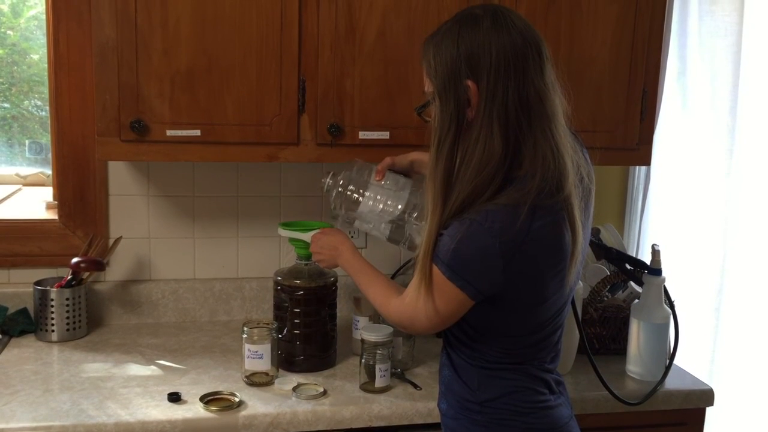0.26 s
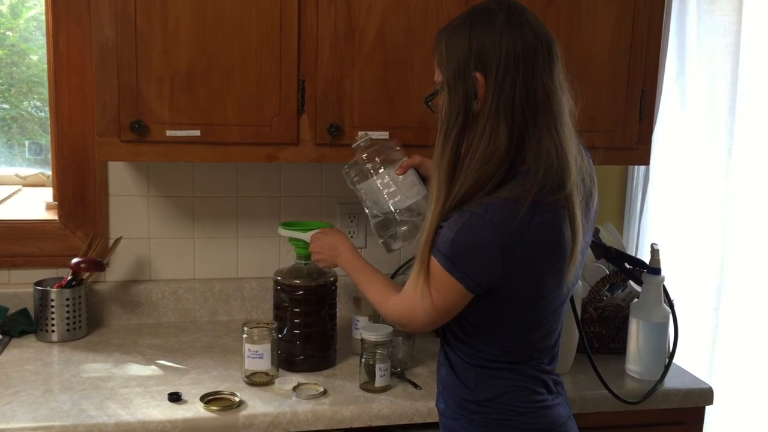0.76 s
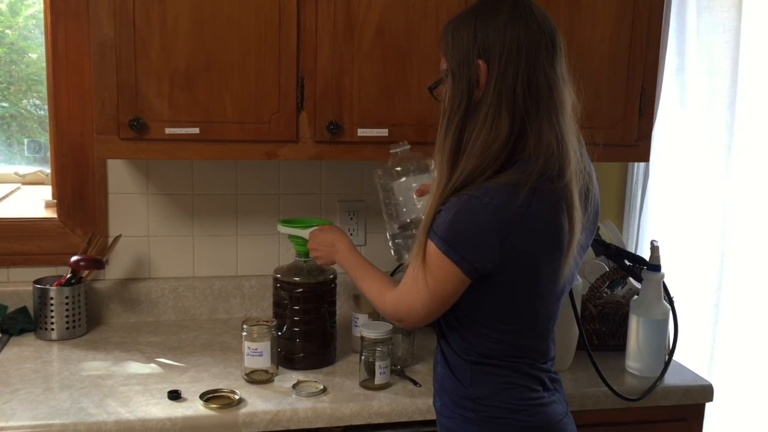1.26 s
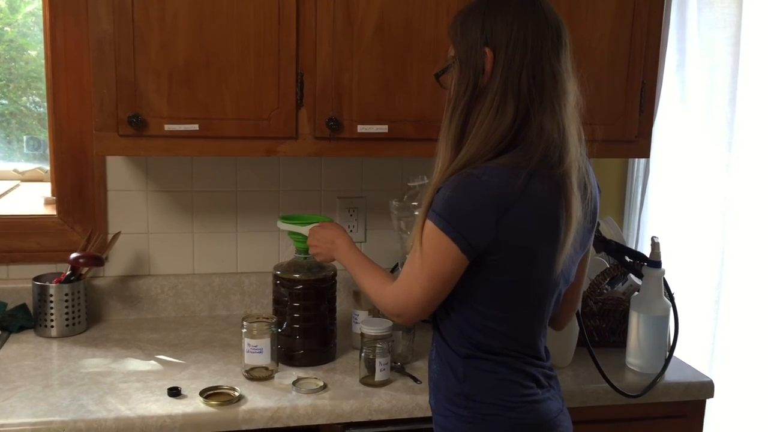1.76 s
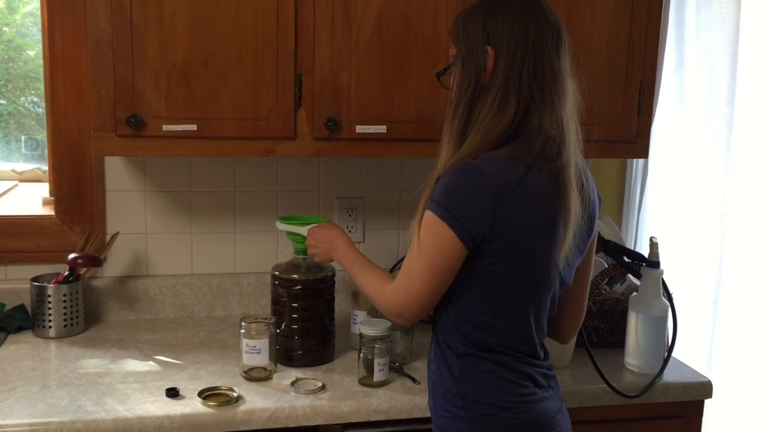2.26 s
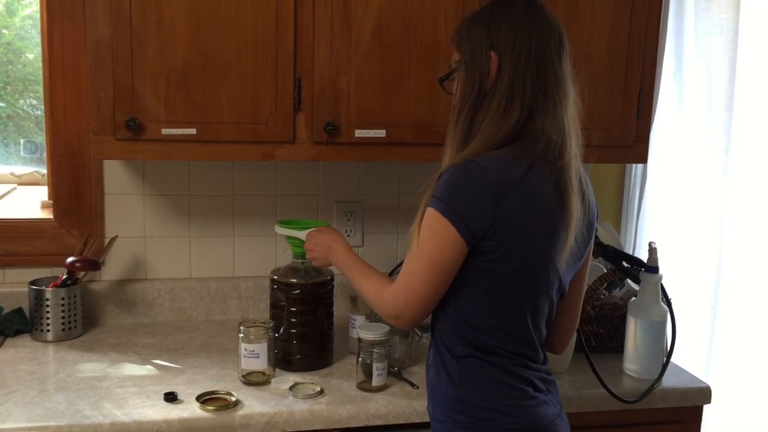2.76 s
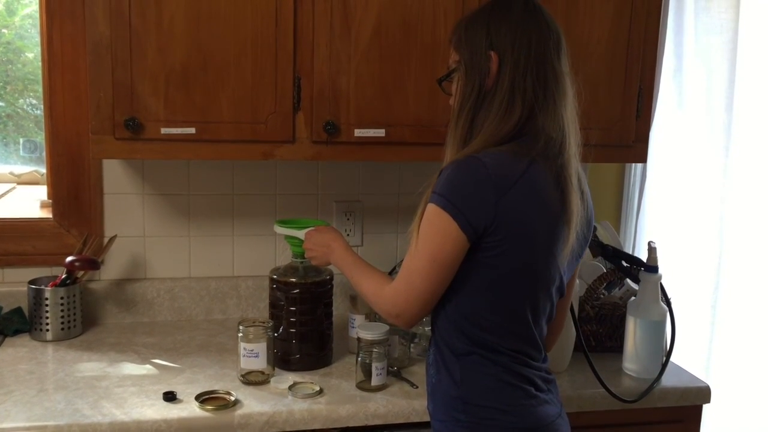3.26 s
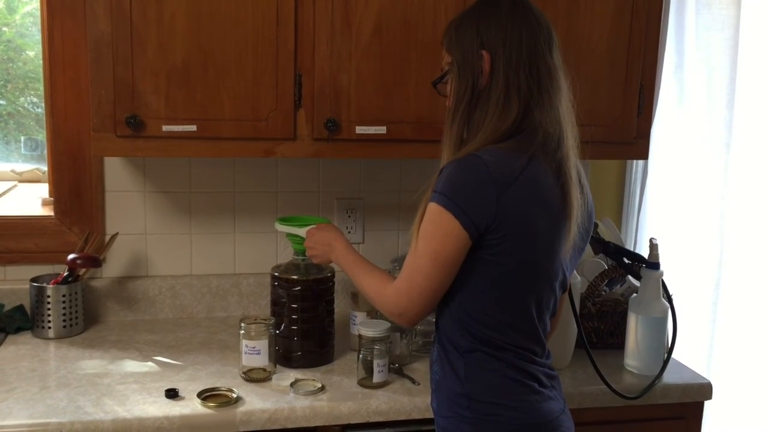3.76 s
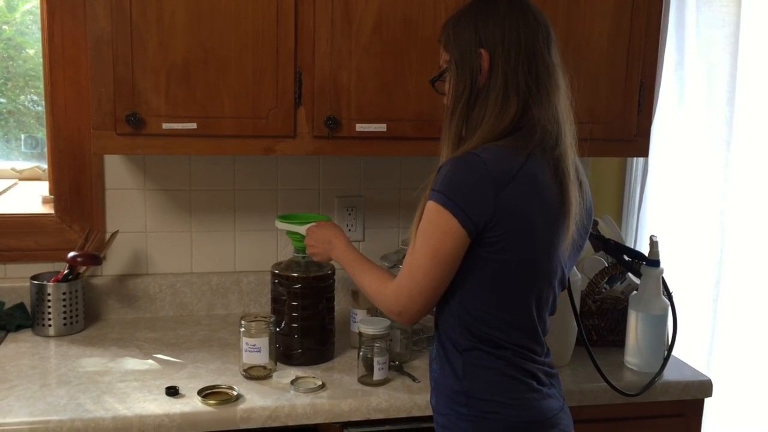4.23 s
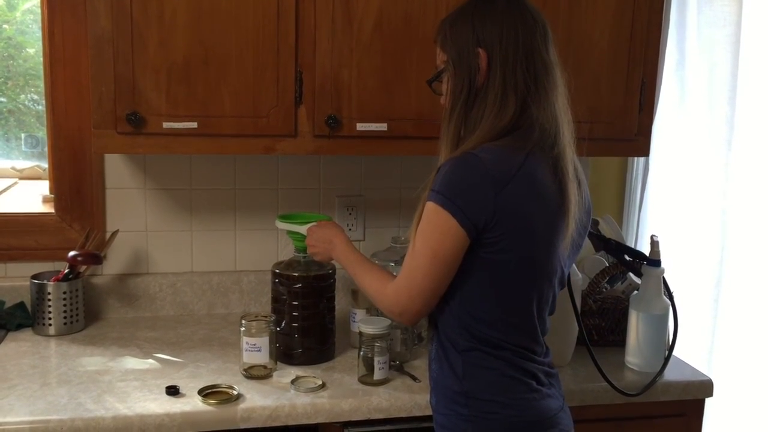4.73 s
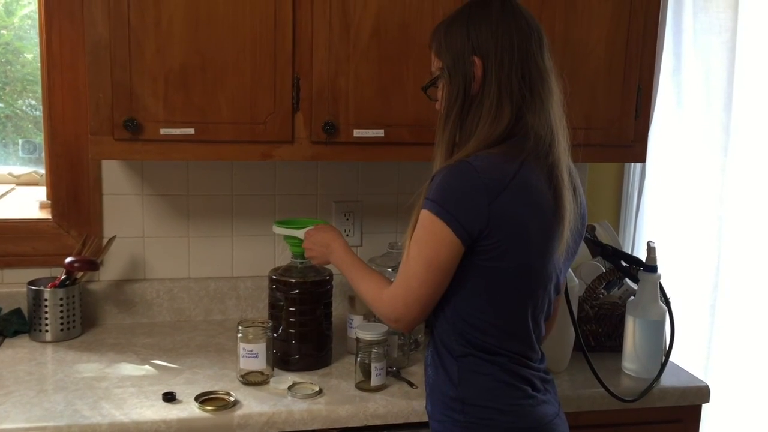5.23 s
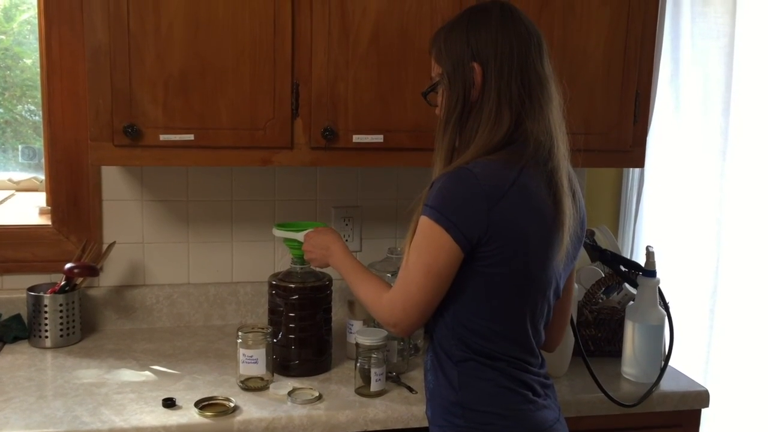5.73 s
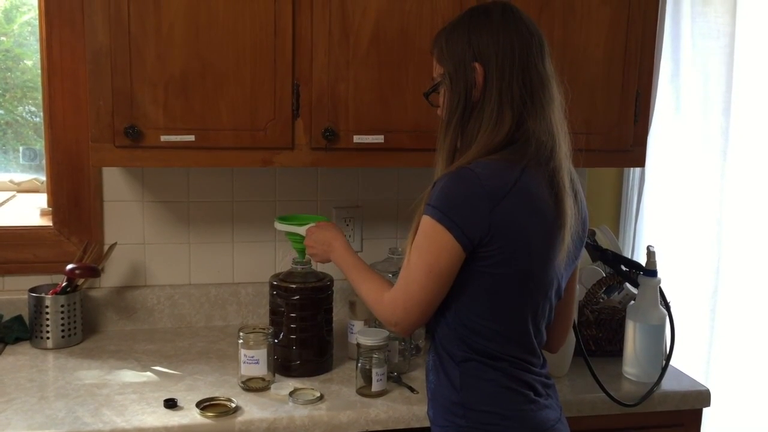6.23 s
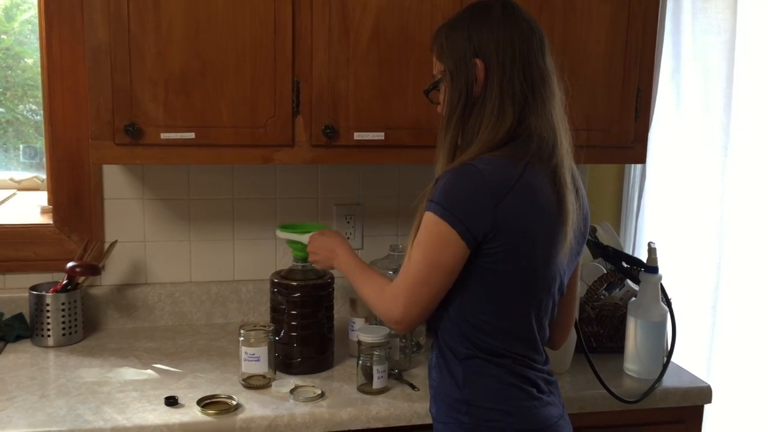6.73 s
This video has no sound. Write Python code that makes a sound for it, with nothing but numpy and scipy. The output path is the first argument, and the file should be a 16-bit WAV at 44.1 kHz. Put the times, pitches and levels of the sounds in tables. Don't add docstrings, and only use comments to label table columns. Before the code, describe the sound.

Quiet room air first, with one tiny tick. Then hollow glugs, slapping water, closing bubbles and high clear drips, all ringing briefly off hard kitchen surfaces. The jug thumps, lightly touches glass and drags over the counter. Sparse small drips and a faint fizz follow, then a double plop and several close plastic taps with a low thud at the end.

```python
import sys
import numpy as np
from scipy import signal
from scipy.fft import rfft, irfft
from scipy.io import wavfile
from scipy.ndimage import uniform_filter1d

SR = 44100
rng = np.random.default_rng(int(sys.argv[2]) if len(sys.argv) > 2 else 0)


def dump(signal):
    limited = np.clip(np.atleast_2d(signal).T, -1, 1)
    pcm = np.round(limited * 32767).astype(np.int16)
    wavfile.write(sys.argv[1], SR, pcm)


def invert_db(level):
    return 10 ** (np.asarray(level, dtype=float) / 20)


N = 308259
DROP_GLIDE_OCT = 0.01


def evened(x):
    return x / np.sqrt(np.mean(x ** 2) + 1e-20)


def read(points, hz):
    f, value = np.transpose(points)
    return np.interp(np.log(hz + 1), np.log(f + 1), value)


def curve(rows, rise_db_per_s, fall_db_per_s):
    crest_s, db = np.transpose(rows)
    t = np.arange(0, N + 64, 64)[:, None] / SR - crest_s
    drop_db = np.maximum(-rise_db_per_s * t, fall_db_per_s * t)
    power = (invert_db(db - drop_db) ** 2).sum(axis=1)
    return np.interp(np.arange(N) / 64, np.arange(len(t)), np.sqrt(power))


def add(mix, s, sound):
    part = mix[round(s * SR):][:len(sound)]
    part += sound[:len(part)]


def noise(points, patchy_db, size=1024):
    hz = np.fft.rfftfreq(size, 1 / SR)
    a, b, patches = rng.standard_normal((4 * N // size + 5, len(hz), 3)).T
    patches = uniform_filter1d(patches, size=9, axis=0)
    patches = evened(uniform_filter1d(patches, size=9, axis=1))
    z = (a + 1j * b) * invert_db(read(points, hz)[:, None] + patchy_db * patches)
    z[hz < points[0][0]] = 0
    return evened(signal.istft(z, nperseg=size, noverlap=3 * size // 4)[1][:N])


def bubble(hz, cycles, glide_oct):
    cycles = max(cycles, 1)
    u = np.arange(int(3 * cycles / hz * SR)) * hz / SR / cycles
    turns = np.cumsum(hz * 2 ** (glide_oct * u)) / SR
    shape = (1 - np.exp(-6 * u)) ** 2 * np.exp(-3 * u)
    return shape / shape.max() * np.sin(2 * np.pi * turns)


def rung(rows, glide_oct):
    out = np.zeros(N)
    for s, db, hz, cycles in rows:
        add(out, s, invert_db(db) * bubble(hz, cycles, glide_oct))
    return out


def swarm(low_hz, high_hz, per_s, cycles, spread_db):
    out = np.zeros(N)
    kinds = [bubble(hz, cycles, 0.27) for hz in np.geomspace(low_hz, high_hz, 24)]
    for when, kind, size in rng.random((int(per_s * N / SR), 3)):
        gain = invert_db(spread_db * min(-np.log(size), 3))
        add(out, when * N / SR, gain * kinds[int(kind * len(kinds))])
    return evened(out)


def struck(modes, tilt_db=0, spread_db=3, order=0):
    t = np.arange(3000) / SR
    ring = np.zeros(len(t))
    for k, (hz, width_hz, db) in enumerate(modes):
        level_db = db + spread_db * rng.standard_normal() + tilt_db * np.log2(hz / 1000)
        decay = np.exp(-np.pi * max(width_hz, 40) * t)
        onset = 1 - np.exp(-hz * t)
        ring += invert_db(level_db) * decay * onset * np.sin(2 * np.pi * hz * t + np.pi * order * k)
    return ring / abs(ring).max()


def sway():
    # (time [s], level [dB])
    gusts = [(0.05, -47.5), (0.8, -42.5), (1.15, -52.5), (1.75, -44), (2.02, -44.5), (2.45, -52.5),
             (2.76, -50), (3.05, -46), (3.5, -49), (3.85, -57), (4.17, -46.5), (4.63, -47), (4.94, -47.5),
             (5.27, -47.5), (5.65, -49.5), (5.88, -45), (6.48, -48), (6.85, -44.5)]
    hz = np.fft.rfftfreq(N, 1 / SR)
    wobble = irfft(rfft(rng.standard_normal(N)) * np.exp(-((hz - 9.2) / 2.7) ** 2), N)
    wobble /= abs(signal.hilbert(wobble)) + 0.13 * wobble.std()
    return curve(gusts, 39, 59.5) * evened(wobble)


def rumble():
    # (frequency [Hz], density [dB per Hz])
    floor = [(16, -3.5), (30, 0), (50, -13), (105, -14.5), (135, -24.5), (160, -49)]
    # (time [s], level [dB])
    shifts = [
        (0, -74.5),
        (2.1, -79),
        (3.0, -75),
        (4.2, -71.5),
        (6.2, -83),
    ]
    level = curve(shifts, 12, 46) + invert_db(-71.5)
    return level * noise(floor, patchy_db=1, size=8192)


def drone():
    # (time [s], level [dB])
    swell = [
        (4.6, -84.5),
    ]
    hum = noise([(200, -17.5), (272, 1.5), (320, -9), (500, -36)], patchy_db=-2, size=4096)
    return (curve(swell, 24, 7) + invert_db(-97)) * hum


def hiss():
    # (frequency [Hz], density [dB per Hz])
    still_air = [(76, -20), (130, -0.5), (262, -4.5), (333, -10.5), (361, 3), (391, -8.5), (424, -6),
                 (633, -9.5), (758, -8), (1590, -12.5), (15600, -35)]
    return invert_db(-82) * noise(still_air, patchy_db=0.5)


def ticks():
    # (time [s], peak level [dB])
    stray = [
        (.26, -69),
        (1.929, -78),
        (2.011, -64),
        (5.49, -70),
        (6.515, -71),
    ]
    out = np.zeros(N)
    for s, db in stray:
        add(out, s, invert_db(db) * np.diff(rng.standard_normal(25) * np.hanning(25)))
    return out


def glugs():
    # (time [s], peak level [dB], pitch [Hz], ring [cycles], wall share [dB])
    gulps = [(1.494, -49.5, 413, 2.5, -13), (1.54, -46, 440, 4.8, -17), (1.575, -48.5, 515, 3.6, -13.5),
             (1.801, -56.5, 462, 6, -11), (1.838, -46.5, 429, 2.6, -23), (1.895, -69, 470, 3.9, 6.5),
             (1.999, -76.5, 486, 2.4, 13), (2.043, -60.5, 445, 1.6, 2), (2.09, -52.5, 447, 4.5, -9),
             (2.209, -51, 467, 6.5, -7.5), (2.265, -62, 487, 9.2, 3), (2.635, -59.5, 765, 5.5, -3.5),
             (2.957, -58, 470, 5.8, -3), (3.035, -69, 466, 6.2, 4), (3.103, -62, 470, 6.2, 3.5),
             (3.301, -76.5, 430, 12, 6.5), (3.487, -58, 440, 6.6, -0.5), (3.645, -56.5, 428, 2.9, 1.5),
             (3.686, -65, 416, 2.2, -12), (3.783, -54.5, 470, 2.5, 1), (3.892, -38, 600, 2.1, -8),
             (3.959, -44.5, 660, 1.55, -7.5), (4.107, -59.5, 645, 4.9, 1.5), (4.312, -56, 400, 5.1, 6.5)]
    # (frequency [Hz], width [Hz], level [dB])
    wall = [(200, 15, -18), (440, 105, 4.5), (456, 50, -3.5), (614.6, 36, 0), (849, 130, -5),
            (1050, 210, -18), (1363, 98, -8.5), (2100, 350, -13), (3170, 330, -17)]
    out = np.zeros(N)
    for s, db, hz, cycles, wall_db in gulps:
        add(out, s, invert_db(db) * bubble(hz, cycles, 0.035))
        add(out, s, invert_db(db + wall_db) * struck(wall))
    return out


def slap(top_hz, size=200):
    i = np.arange(size)
    burst = rng.standard_normal(size) * np.exp(-i / 52) * np.minimum(i / 9.6, 1)
    band_hz = [top_hz / 3.7, min(top_hz, SR / 2.2)]
    band = signal.butter(2, band_hz, "bandpass", fs=SR, output="sos")
    shaped = signal.sosfilt(band, np.pad(burst, (0, size)))
    return shaped / abs(shaped).max()


def slaps():
    # (time [s], peak level [dB], brightest pitch [Hz])
    hits = [(1.495, -75, 1500), (1.576, -70, 1800), (1.8, -71, 1080), (1.894, -70, 1290),
            (2.045, -71, 1310), (2.216, -61, 2000), (2.267, -59, 2000), (2.336, -62, 5050),
            (2.456, -54.5, 7700), (2.636, -62.5, 2000), (2.962, -56.5, 2350), (3.031, -59.5, 4500),
            (3.636, -58.5, 7000), (3.695, -50.5, 3070), (3.784, -58, 1500), (3.89, -47.5, 2800),
            (4.106, -54.5, 1500), (4.251, -54.5, 5030), (6.609, -65, 4000), (6.766, -52.5, 4000),
            (6.908, -58.5, 3440)]
    out = np.zeros(N)
    for s, db, top_hz in hits:
        add(out, s, invert_db(db) * slap(top_hz))
    return out


def slosh():
    # (crest time [s], level [dB], small bubbles against large [dB])
    surges = [(1.6, -78.5, -13), (1.93, -81, -20), (2.1, -72.5, -17), (2.24, -75, -12), (2.39, -80, 3),
              (2.69, -77, -7), (2.83, -74, -8), (3.048, -79, 3), (3.15, -83, -0.5), (3.688, -67.5, -6.5),
              (3.82, -66, -10.5), (4.0, -69, -11.5), (4.24, -65.5, -4.5), (4.37, -70.5, -7),
              (4.52, -73.5, -9), (4.77, -83, -4.5)]
    rise_db_per_s, fall_db_per_s = 153, 95.5
    large = curve([(s, db) for s, db, fine_db in surges], rise_db_per_s, fall_db_per_s)
    small = curve([(s, db + fine_db) for s, db, fine_db in surges], rise_db_per_s, fall_db_per_s)
    out = large * swarm(332, 910, 200, cycles=3.47, spread_db=-2)
    return out + small * swarm(1050, 3030, 300, cycles=6, spread_db=2.5)


def fizz():
    # (time [s], level [dB])
    trickle = [
        (2.25, -93.5),
        (4.6, -88),
        (5.15, -96),
        (5.8, -85.5),
    ]
    return curve(trickle, 30, 26.5) * swarm(5500, 11000, 150, cycles=12, spread_db=3.5)


def thuds():
    # (time [s], peak level [dB], pitch [Hz])
    knocks = [(1.541, -66.5, 100), (1.839, -63, 100), (2.101, -65, 100), (2.251, -68, 97),
              (3.501, -67.5, 101), (3.645, -65, 200), (3.734, -66, 200), (3.786, -60, 208),
              (3.893, -50.5, 206), (3.961, -64, 199), (4.115, -62.5, 200), (4.228, -54, 224),
              (4.243, -49.5, 188.6), (4.274, -57, 163), (4.314, -65, 299), (4.47, -63, 200),
              (6.611, -65, 59.8), (6.768, -53, 61), (6.777, -57, 100.6), (6.772, -66.5, 378),
              (6.788, -64.5, 233), (6.915, -75, 371), (6.908, -64, 62), (6.98, -44, 29.6)]
    return rung([(s, db, hz, 4.6 * (hz / 100) ** 0.32) for s, db, hz in knocks], -0.0084)


def bubbles():
    # (time [s], peak level [dB], pitch [Hz], ring [cycles])
    pockets = [(1.575, -51, 966, 3.7), (1.679, -69, 1300, 7.3), (1.71, -73, 1675, 6.9),
               (1.745, -71.5, 2100, 10), (2.12, -71, 1232, 7.8), (2.204, -66, 930, 4.3),
               (2.268, -62, 1450, 10), (2.338, -47, 1410, 3.9), (2.445, -59.5, 1050, 5.7),
               (2.638, -64, 1330, 8.6), (2.764, -54, 1493, 17), (2.765, -60.5, 2370, 6.4),
               (2.773, -49.5, 1500, 8.1), (2.957, -56.5, 1000, 4.1), (3.118, -59, 860, 5.5),
               (3.328, -74, 930, 12), (3.387, -67.5, 1390, 6), (3.549, -60.5, 1570, 8.2),
               (3.554, -62, 1050, 7.7), (3.638, -62.5, 1480, 12), (3.688, -61, 1450, 5.9),
               (4.229, -60.5, 1016, 7.3), (4.374, -51, 2690, 23), (4.373, -54, 3550, 15.4),
               (4.751, -66, 1330, 4.9), (5.579, -78.5, 1500, 14), (5.885, -77.5, 1876, 23),
               (6.03, -74, 3100, 12), (6.128, -67, 2290, 23), (6.275, -73, 1690, 9.7),
               (1.801, -67.5, 930, 4.2), (1.803, -63.5, 704, 3.7), (1.848, -64, 604, 5.6),
             (1.894, -62.5, 950, 5), (1.933, -65, 850, 7.7), (1.968, -75, 835, 6), (2.0, -70, 797, 14),
             (2.045, -61, 680, 3), (2.093, -60.5, 623, 9.8), (2.095, -77, 1700, 8.4),
             (2.194, -63.5, 676, 4.5), (2.2, -69, 1670, 10), (2.214, -60, 639, 11), (2.236, -67, 1970, 11),
             (2.241, -72, 2400, 14), (2.266, -56.5, 824, 3.8), (2.271, -74, 2590, 14),
             (2.286, -69, 1900, 8), (2.319, -78, 2580, 10), (2.235, -67, 470, 5), (2.29, -66, 1050, 7.8),
             (2.336, -69, 2900, 6.8), (2.97, -63.5, 800, 3.8), (3.648, -57, 840, 7.1),
             (2.325, -62, 890, 4.9), (2.567, -73, 1755, 14), (2.66, -70, 740, 7.6), (3.02, -68, 2690, 12),
             (3.065, -68, 1050, 7), (3.103, -66, 755, 7.2), (3.168, -70.5, 2870, 10),
             (3.17, -79, 1950, 8.2), (3.286, -74, 930, 8.6), (3.328, -69, 1320, 8), (3.4, -75, 2560, 14),
             (3.419, -77, 1500, 7.9), (3.445, -69.5, 480, 5.7), (3.476, -70, 1030, 8.2),
             (3.574, -76, 2520, 14), (3.648, -59.5, 2520, 8.5), (3.695, -66, 1930, 6.9),
             (3.715, -65, 2270, 9.1), (3.74, -73, 1160, 3.5), (3.782, -61, 770, 2.3),
             (3.903, -47.5, 1050, 7.1), (3.893, -56, 1610, 13), (4.192, -71, 1420, 27)]
    return rung(pockets, 0.032)


def drops():
    # (time [s], peak level [dB], pitch [Hz],
    # ring [cycles])
    small_drops = [(2.164, -65.5, 7430, 21), (2.86, -55.5, 7800, 29), (2.86, -65, 5560, 10),
                   (3.152, -67, 7200, 14), (3.317, -54, 9000, 6.3), (3.33, -66, 5860, 10), (3.752, -67, 8400, 23),
                   (3.763, -67.5, 8320, 32), (3.764, -64, 6950, 21), (3.765, -66, 5250, 16),
                   (3.78, -62.5, 5600, 8.8), (3.706, -79, 9000, 70), (3.897, -68.5, 10600, 26),
                   (3.78, -61, 7450, 8), (3.32, -56, 7400, 15), (4.373, -64, 4700, 18), (4.374, -62, 6150, 13),
                   (4.12, -65.5, 5750, 13), (4.2, -70, 5840, 12), (4.25, -66, 7100, 9), (4.22, -62.5, 7300, 8),
                   (4.48, -63.5, 9840, 26), (3.897, -72, 5100, 35), (3.896, -66, 7830, 37),
                   (4.477, -59.5, 4430, 18), (4.478, -53.5, 5350, 16), (4.481, -50, 6920, 38),
                   (4.518, -65, 6060, 9.3), (4.66, -66, 6250, 27), (4.73, -71, 6200, 16), (4.705, -67, 6740, 23),
                   (4.853, -69, 6900, 26), (4.973, -78, 4460, 40), (4.99, -75, 8300, 34), (5.0, -74, 7080, 60),
                   (5.007, -73.5, 4600, 66), (5.21, -72.5, 7200, 45), (5.437, -71, 7600, 33),
                   (5.486, -64, 7680, 17), (5.62, -72, 7000, 26), (5.72, -73, 7140, 42), (5.879, -68, 9500, 22),
                   (5.892, -74, 7150, 22), (5.89, -69.5, 4950, 42), (6.107, -70.5, 5270, 12),
                   (6.127, -69, 3820, 24), (6.127, -69.5, 8760, 25), (6.18, -77, 6500, 22),
                   (5.419, -87, 1430, 17), (5.59, -83, 2100, 9.3), (5.619, -87, 1600, 16), (5.86, -87, 1800, 9.7),
             (5.889, -79, 3940, 16), (5.93, -81, 2340, 11), (5.835, -82, 4400, 20),
             (6.622, -67.5, 710, 7.6), (5.505, -86, 1400, 27), (5.695, -83, 1535, 24),
             (5.745, -85, 1690, 16), (5.746, -87, 2040, 14), (5.815, -79, 1750, 12), (5.82, -83, 2460, 14),
             (6.026, -80, 1810, 17), (6.04, -77, 3500, 24), (6.086, -82, 1990, 22), (6.127, -67, 3530, 17)]
    return rung(small_drops, DROP_GLIDE_OCT)


def drips():
    # (time [s], peak level [dB], pitch [Hz], ring [cycles], splash against bubble [dB])
    falling = [(2.204, -61.5, 7100, 3.9, -14), (2.542, -56, 7800, 10, 4), (2.862, -49.5, 7100, 7.2, 0),
               (3.055, -61, 7460, 5.2, -19), (3.316, -53, 8100, 4.2, 0), (3.696, -72, 5070, 19, -10),
               (3.767, -63, 10500, 8.6, 7), (3.897, -63, 6200, 11, -15), (4.017, -65, 7800, 11, -22),
               (4.479, -58.5, 11500, 22, -17), (4.483, -45.5, 6200, 12, -26), (4.504, -49, 6070, 9.5, -32),
               (4.608, -69, 11300, 22, -5), (4.909, -65.5, 7660, 6.2, -5), (5.392, -67, 8000, 7.2, -17),
               (5.584, -58, 5930, 12, -14), (5.605, -62, 5760, 11, -18), (5.72, -63, 5950, 18, -16),
               (5.746, -57.5, 9440, 5.6, -26), (5.766, -78, 11000, 5, -25), (5.857, -67, 10200, 8, -23),
               (6.04, -71, 10000, 5.5, -27), (6.13, -66, 10600, 7.4, -27), (6.32, -71.5, 5400, 8.5, -14)]
    out = np.zeros(N)
    for s, db, hz, cycles, splash_db in falling:
        add(out, s, invert_db(db) * bubble(hz, cycles, 0.069))
        snap = np.diff(uniform_filter1d(rng.standard_normal(81), size=3), 2)
        splash = snap * np.exp(-np.arange(79) / 10)
        add(out, s, invert_db(db + splash_db) * splash / abs(splash).max())
    return out


def gurgles():
    # (time [s], peak level [dB], pitch [Hz], ring [cycles], glide [octaves])
    rising = [
        (2.4, -58.5, 470, 25, 1.5),
        (2.828, -57, 557, 32, 2.5),
        (3.0, -67, 2290, 57, 0.35),
        (3.506, -54.5, 620, 26.5, 1.43),
        (3.528, -60.5, 1097, 30.3, 0.9),
        (6.956, -58, 900, 31, 0.),
    ]
    out = np.zeros(N)
    for s, db, hz, cycles, glide_oct in rising:
        rise = bubble(hz, cycles / 2, glide_oct / 2)
        sustain = np.exp(np.linspace(0, 3, len(rise))) * np.hanning(len(rise))
        add(out, s, invert_db(db) * rise * sustain)
    return out


def wall_rings():
    # (time [s], peak level [dB], pitch [Hz], ring [cycles])
    rings = [(2.958, -55, 632, 17), (3.036, -61, 480, 7), (3.642, -57, 450, 3.7), (3.655, -57, 590, 6.6),
             (3.667, -55, 454, 7.1), (3.688, -61, 427, 5), (3.716, -66, 2080, 27), (3.779, -64, 847, 11),
             (3.789, -53, 462, 3.2), (3.855, -70, 1390, 18), (3.886, -47.5, 650, 14), (3.889, -48, 897, 10),
             (3.893, -52.5, 1330, 17), (3.898, -41.5, 491, 6), (3.908, -46.5, 576, 9.1),
             (3.913, -44, 408, 8.4), (3.917, -54, 868, 17), (3.948, -58, 647, 29), (3.953, -50, 415, 6.5),
             (3.955, -56, 863, 19), (3.995, -57, 500, 5), (4.018, -67, 636, 6.1), (4.121, -55.5, 525, 5.6),
             (4.136, -65, 624, 12), (4.252, -60, 600, 12), (4.286, -61, 162, 2.3), (4.295, -63, 593, 12),
             (4.314, -59.5, 930, 14), (6.609, -58.5, 1130, 12), (6.766, -55.5, 1052, 26),
             (6.909, -65, 1050, 12)]
    return rung(rings, DROP_GLIDE_OCT)


def glass():
    # (time [s], peak level [dB])
    touches = [
        (3.785, -63.5),
        (3.915, -78),
    ]
    # (frequency [Hz], level [dB], t60 [s])
    jar = [
        (2030, -2.5, 1.6),
        (2042, -2.5, .45),
        (5350, -22, .5),
        (7850, -22, .3),
    ]
    out, t = np.zeros(N), np.arange(SR // 2) / SR
    for s, db in touches:
        ring = sum(invert_db(db + d - 60 * t / t60) * np.sin(2 * np.pi * hz * t) for hz, d, t60 in jar)
        damped = 1 / (1 + np.exp((s + t - 4.02) / 0.011))
        add(out, s, ring * (1 - np.exp(-t / 0.0016)) * damped)
    return out


def scrape():
    # (time [s], level [dB])
    pushes = [
        (4.05, -80.5),
        (4.2, -75.5),
        (4.3, -78.5),
        (4.42, -71),
        (4.56, -80),
        (4.76, -78.5),
    ]
    # (frequency [Hz], density [dB per Hz])
    drag = [(880, -15), (1500, -4), (1660, -8), (1830, -8.5), (3850, -13.5), (5600, -11.5), (14000, -33)]
    grit = swarm(2500, 9000, 500, cycles=3, spread_db=2.5)
    return curve(pushes, 75, 121) * (0.9 * noise(drag, patchy_db=2, size=128) + 0.45 * grit)


def plops():
    # (time [s], peak level [dB], pitch [Hz])
    pair = [
        (6.261, -57.5, 955),
        (6.27, -56, 998),
    ]
    return rung([(s, db, hz, 16) for s, db, hz in pair], DROP_GLIDE_OCT)


def taps():
    # (time [s], peak level [dB], brightness [dB per octave])
    knocks = [
        (6.608, -52, 1),
        (6.767, -45.5, 2),
        (6.907, -50.5, -3),
        (6.984, -63, 3),
    ]
    # (frequency [Hz], width [Hz], level [dB])
    plastic = [(725, 220, -0.5), (1050, 87, -1.5), (1330, 180, -3.5), (1600, 140, -6.5), (2036, 290, -2),
               (2480, 380, -14), (3500, 330, -9), (4600, 1600, -23), (6200, 1400, -9)]
    out = np.zeros(N)
    for s, db, tilt_db in knocks:
        add(out, s, invert_db(db) * struck(plastic, tilt_db, spread_db=0.5, order=1))
    return out


def kitchen(x):
    # (frequency [Hz], t60 [s], level [dB])
    bands = np.array([(100, 0.62, 2), (470, 0.23, -0.5), (1500, 0.29, 1), (4000, 0.3, -2.5),
                      (7800, 0.28, -2), (13800, 0.12, 0.5)])
    turn, out = np.arange(N) / SR * 7 * np.pi, np.zeros(N)
    for k in range(3):
        echoes, at = np.zeros(SR // 2), np.arange(60, SR // 2 - 20, 20)
        echoes[at + rng.integers(0, 20, len(at))] = rng.choice([-1., 1.], len(at))
        hz, t, z = signal.stft(echoes, SR, nperseg=256)
        t60_s = read(bands[:, [0, 1]], hz)[:, None]
        level_db = read(bands[:, [0, 2]], hz)[:, None]
        tail = signal.istft(z * invert_db(-60 * t / t60_s + level_db), SR, nperseg=256)[1]
        share = np.sqrt(2 / 3) * np.cos(turn + k * np.pi / 3)
        out += signal.fftconvolve(x * share, tail / np.linalg.norm(tail))[:N]
    return out


def direct_path(x):
    # (frequency [Hz], gain [dB])
    path = [(300, 0), (900, 2), (2500, 3), (6000, -0.5), (12000, -1)]
    return irfft(rfft(x) * invert_db(read(path, np.fft.rfftfreq(N, 1 / SR))), N)


def scene():
    air = hiss() + rumble() + sway() + drone() + ticks()
    water = glugs() + bubbles() + drops() + drips() + gurgles()
    moving = slosh() + fizz() + slaps() + scrape()
    close = thuds() + wall_rings() + plops()
    knocks = taps()
    near = invert_db(-3.5) * water + invert_db(-5) * moving + invert_db(-8.5) * close
    room = invert_db(4) * kitchen(near + invert_db(-4.5) * knocks)
    return (direct_path(near) + room + invert_db(-3) * knocks + close + glass() + air)[None]


def top_cut(x):
    return signal.sosfilt(signal.butter(12, 15790, fs=SR, output="sos"), x)


def record(dry):
    return top_cut(dry)


dry = scene()
out = record(dry)
dump(out)
```